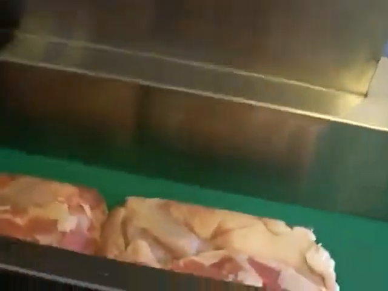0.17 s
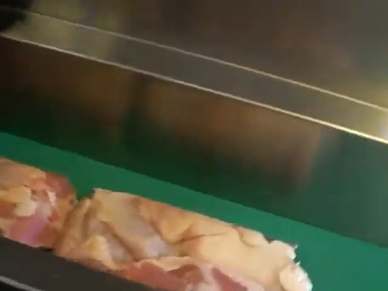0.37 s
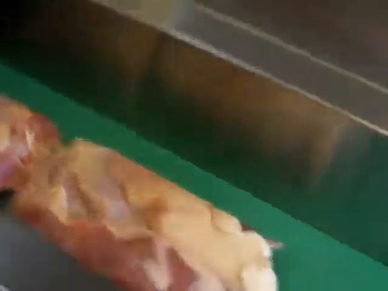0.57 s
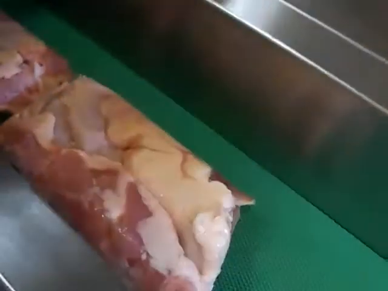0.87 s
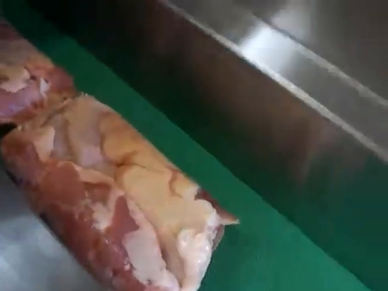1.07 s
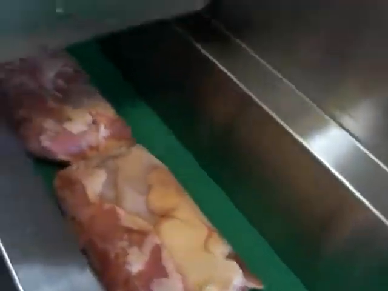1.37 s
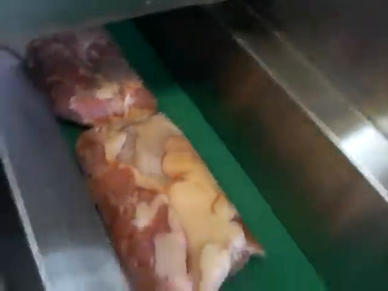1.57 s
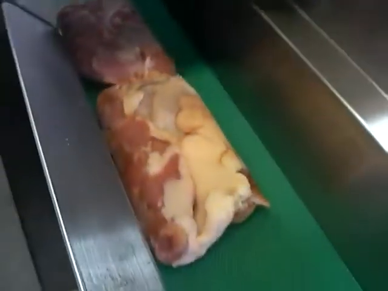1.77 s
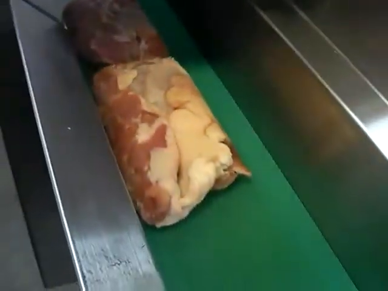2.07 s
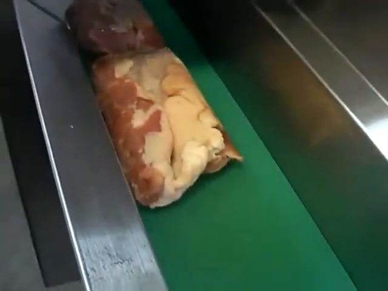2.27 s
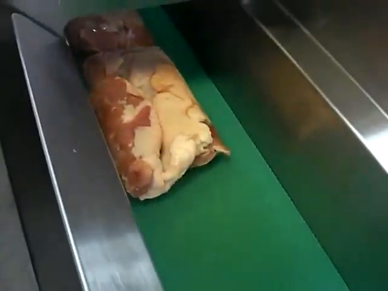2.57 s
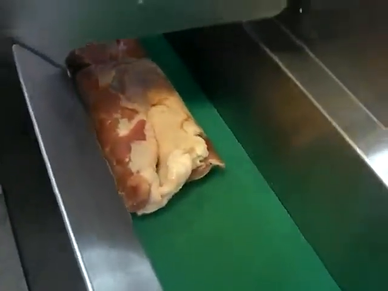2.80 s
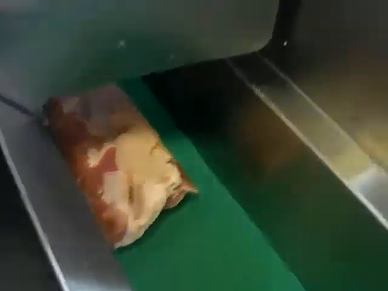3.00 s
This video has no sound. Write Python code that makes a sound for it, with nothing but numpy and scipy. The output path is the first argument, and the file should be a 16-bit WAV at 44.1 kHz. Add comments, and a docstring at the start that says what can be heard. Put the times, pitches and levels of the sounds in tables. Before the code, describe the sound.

Close hand-held phone beside a meat slicer: a ringing frame knock leads a harsh metallic bite and slam, repeating evenly eight times over steady broad rush and swelling high electric whine, with a little room echo.

```python
"""A meat slicer runs in a workshop, heard from a hand-held phone beside its belt.
Throughout, fans and belts rush (broad noise) and the inverter whines in thin lines that swell and fade.
Each turn the crank first knocks on the steel frame (damped beating modes, loose rattle);
then the blade bites and slams through: two bright clanks of dense random contacts, filtered by blade and guard.
From 0.84 s on, stray bright ticks and dull double taps fall in between."""
import sys
import numpy as np
from scipy import signal
from scipy.fft import rfft, irfft, next_fast_len
from scipy.io import wavfile

SR = 44100
rng = np.random.default_rng(int(sys.argv[2]) if len(sys.argv) > 2 else 0)


def master_out(mix):
    """Clip the mix to full scale and print it as 16-bit PCM to the path in sys.argv[1]."""
    frames = np.transpose(np.atleast_2d(mix))
    ceiling = np.clip(frames, -1, 1)
    pcm = np.round(ceiling * 32767).astype(np.int16)
    wavfile.write(sys.argv[1], SR, pcm)


def ratio(d):
    """dB to gain"""
    e = np.asarray(d, float) / 20
    return 10 ** e


N = 138474

# rush spectrum: f/Hz, relative density/dB
RUSH_SPECTRUM = [(25, -32), (132, 1.5), (230, -5.5), (300, 5), (481, -3.5), (780, -0.5), (1100, -6.5),
                 (3300, -13), (4130, -11.5), (6000, -11), (7660, -13), (9750, -10.5), (12500, -18.5),
                 (13800, -15), (15400, -5)]
# side-to-mid gain of everything but the whine: f/Hz, gain/dB
SIDE_GAIN = [(25, -19), (125, -20.5), (250, -24), (700, -15), (2000, -11.5), (4400, -4.5), (8000, -1.5),
             (15000, 0)]
# main inverter lines: f/Hz
WHINE_HZ = (10051, 9938, 3998)
# their mid levels as the phone moves: t/s, then one level/dB per line
WHINE_LEVELS = [(0, -50, -47, -48), (.17, -48, -40, -62), (.27, -49, -50, -45), (.38, -34.5, -43.5, -43),
                (.6, -50, -43, -48), (.88, -49, -46.5, -51.5), (1.2, -41, -39, -53),
                (1.38, -34, -44, -54.5), (1.56, -44, -48, -52), (1.68, -41, -48.5, -46),
                (1.798, -37, -43, -60), (2.0, -40, -54, -52.5), (2.11, -35.5, -47, -48),
                (2.2, -37.5, -51, -53.5), (2.45, -35.5, -43, -56), (2.8, -37.5, -44, -50.5),
                (2.9, -46.5, -46.5, -54.5), (3.14, -51, -36.5, -48)]
# faint inverter lines: f/Hz, mean level/dB
FAINT_LINES = [(1950, -65), (5940, -60), (6052, -58), (11881, -58)]
# dull double taps near the phone: t/s, level/dB, f/Hz
TAPS = [(.858, -10, 928), (0.86, -8, 418), (2.907, -9.5, 680), (2.942, -9, 800), (3.014, -7, 776),
        (3.084, 0.5, 620)]
# crank knocks: t/s, level/dB
KNOCKS = [(0.151, -14), (0.552, -12.5), (0.953, -14), (1.357, -15), (1.76, -13.5), (2.163, -14),
          (2.565, -13), (2.967, -12.5)]
# steel frame modes: f/Hz, level/dB, undamped t60/s, delay/ms
FRAME_MODES = [(322, -13.5, .3, 12.2), (377, -8.5, .15, 6), (1555, -17, .35, 1), (1603, -17.5, .25, 1),
               (476, -25, .15, 4), (786, -21, .3, 24), (1392, -19, .2, 1), (1925, -19.5, .2, 12),
               (2239, -20, .15, 4), (3560, -21, .09, 6)]
# loose rattle under a knock: f/Hz, relative density/dB
KNOCK_RATTLE_SPECTRUM = [(200, -62), (400, 7.5), (800, 2.5), (1600, 7.5), (2900, -1), (3630, 1), (6500, -3),
                         (8000, -22), (12000, -97)]
# blade bites: t/s, level/dB, level of the thud on the frame/dB
BITES = [(0.227, -21, -13), (0.627, -19.5, -17.5), (1.0314, -18.5, -11.5), (1.4326, -19.5, -18),
         (1.836, -20.5, -21), (2.2366, -22, -23.5), (2.6417, -19.5, -20), (3.047, -17, -16.5)]
# blade slams: t/s, level/dB
SLAMS = [(0.254, -18.5), (0.656, -18.5), (1.0574, -29), (1.4596, -20.5), (1.8617, -18.5), (2.2623, -15.5),
         (2.6662, -18.5), (3.0686, -24)]
# stray bright ticks: t/s, level/dB, t60/s
TICKS = [(0.842, -30, 0.053), (1.188, -34.5, 0.1), (3.126, -15.5, 0.013)]
# blade rattle spectrum: f/Hz, relative density/dB
BLADE_SPECTRUM = [(280, -23), (480, -3), (920, -2.5), (1200, -15.5), (2580, -9), (6170, -6.5), (8880, -7.5),
                  (13000, -11.5), (15300, -18.5)]
# blade and guard resonances: f/Hz, width/Hz, boost/dB
GUARD_PEAKS = [(1927, 230, 12), (6200, 230, 7), (8940, 270, 5.5)]

LOW_MODE_HZ = 600


def rms_one(x):
    """Scale to rms 1."""
    return x / np.sqrt(np.mean(x ** 2) + 1e-20)


def at_hz(points, hz):
    """Read a spectrum table on a log-frequency axis."""
    f, v = np.transpose(points)
    return np.interp(np.log(np.maximum(hz, 1)), np.log(f), v)


def colour(x, points, peaks=()):
    """Minimum-phase filter from a spectrum table plus resonances; unit power gain for white input."""
    size = next_fast_len(N + SR // 4) // 2 * 2
    hz = np.arange(size // 2 + 1) * SR / size
    db = at_hz(points, hz) + sum(p / (1 + (2 * (hz - f) / w) ** 2) for f, w, p in peaks)
    unit_power = ratio(db) / np.sqrt(np.mean(ratio(2 * db)))
    # folded cepstrum gives minimum phase
    cepstrum = irfft(np.log(unit_power), size)
    cepstrum[1:size // 2] *= 2
    cepstrum[size // 2 + 1:] = 0
    return irfft(rfft(x, size) * np.exp(rfft(cepstrum)), size)[..., :N]


def drift(rate_hz):
    """Random drift of rms 1: noise through two equal low-pass poles at rate_hz."""
    step = 40  # samples between drift points
    r = np.exp(-2 * np.pi * step * rate_hz / SR)
    noise = rng.standard_normal(N // step + 2002)
    slow = signal.lfilter([1], [1, -2 * r, r * r], noise)[2000:]  # skip the settling
    return np.interp(np.arange(N) / step, np.arange(len(slow)), rms_one(slow))


def bursts(times_s, db, rise_s, t60_s):
    """Summed envelopes: every event rises, then dies away exponentially."""
    t = np.arange(N) / SR - np.reshape(times_s, (-1, 1))
    t = np.maximum(t, 0)
    rise = 1 - np.exp(-(t / rise_s) ** 2)
    decay = ratio(-60 * t / np.reshape(t60_s, (-1, 1)))
    return ratio(np.asarray(db)) @ (rise * decay)


def tail(x, t60_s):
    """Diffuse reverberation: convolution with decaying noise of unit energy."""
    t = np.arange(int(t60_s * SR)) / SR
    ir = rng.standard_normal(SR * 2)[:len(t)] * ratio(-60 * t / t60_s)
    return signal.fftconvolve(x, ir / np.sqrt(np.sum(ir ** 2)))[:N]


def rattle():
    """Dense, uneven, clumped metal contacts as two unlike rows (mid, side), rms 1."""
    contacts_per_s, spread_db, clump_db, clump_hz = 9000, 2.0, 0.8, 38.0
    excess = np.minimum(rng.exponential(1, (2, N)), 4)
    sizes = ratio(spread_db * excess) * rng.choice([-1, 1], (2, N))
    hits = rng.random((2, N)) < contacts_per_s / SR
    return rms_one(sizes * hits * ratio(clump_db * drift(clump_hz)))


def clumps(x):
    """Each half-octave band flickers on its own, as different loose parts clatter in turn."""
    flicker_db, flicker_hz = 2.5, 140
    spectrum = rfft(x)
    octave = np.log2(np.maximum(np.arange(N // 2 + 1) * SR / N, 500) / 500)  # all below 500 Hz is one band
    out = 0
    for k in range(11):
        band = irfft(spectrum * np.maximum(1 - abs(2 * octave - k), 0), N)
        out = out + band * ratio(flicker_db * drift(flicker_hz))
    return out


def rush():
    """Fans, belt and far machines: broad noise that flickers a little."""
    level_db, flicker_db, flicker_hz = -38.5, 0.5, 54.0
    noise = colour(rng.standard_normal((2, N)), RUSH_SPECTRUM)
    return ratio(level_db + flicker_db * drift(flicker_hz)) * noise


def whine():
    """Inverter lines; mid and side fade apart because the phone moves through standing waves."""
    side_db, side_swing_db, faint_swing_db = (-39, -43, -56), 2.5, 2
    flicker_db, waver_rad = 1.2, 0.6
    t = np.arange(N) / SR
    s, *mid_db = np.transpose(WHINE_LEVELS)
    lines = []  # f/Hz, mid level/dB, side level/dB
    for k, hz in enumerate(WHINE_HZ):
        lines.append((hz, np.interp(t, s, mid_db[k]), side_db[k] + side_swing_db * drift(1.0)))
    for hz, db in FAINT_LINES:
        both_db = db + faint_swing_db * drift(1.3)
        lines.append((hz, both_db, both_db))
    out = np.zeros((2, N))
    for hz, *pair_db in lines:
        for k, level_db in enumerate(pair_db):
            phase = 2 * np.pi * hz * t + k * np.pi / 2 + waver_rad * drift(5.9)
            level = np.sqrt(2) * ratio(level_db + flicker_db * drift(6.0))  # dB are rms
            out[k] += level * np.sin(phase)
    return out


def taps():
    """Short dull knocks of one damped tone, each with a bounce."""
    rise_s, t60_s, bounce_s = 0.0014, 0.005, 0.00266
    t = np.arange(N) / SR
    out = np.zeros(N)
    for s, db, hz in TAPS:
        for start_s in (s, s + bounce_s):
            out += bursts([start_s], [db], rise_s, t60_s) * np.sin(2 * np.pi * hz * (t - start_s))
    return out


def struck(times_s, db):
    """Beating frame modes after blows; the load damps them soon. Side is a diffuse tail of mid."""
    rise_s, scatter_db, detune_ratio = 0.005, 1.2, 0.004
    free_s, damped_t60_s = 0.034, 0.045  # rings free, then damped
    t, out = np.arange(N) / SR, 0
    blow = np.clip(np.searchsorted(times_s - 0.02, t) - 1, 0, None)  # index of the current blow
    since_s = t - times_s[blow]
    shape = (len(times_s), len(FRAME_MODES))
    detune = 1 + detune_ratio * rng.standard_normal(shape)
    scatter = scatter_db * rng.standard_normal(shape)
    for k, (hz, mode_db, t60_s, delay_ms) in enumerate(FRAME_MODES):
        delay_s = delay_ms / 1000
        swell = bursts(times_s + delay_s - 1.37 * rise_s, db + mode_db + scatter[:, k], rise_s, t60_s)
        out = out + swell * np.cos(2 * np.pi * hz * detune[blow, k] * (since_s - delay_s))
    out = out * ratio(-60 * np.maximum(since_s - free_s, 0) / damped_t60_s)
    return np.array([out, tail(out, 0.086)])


def knocks():
    """The crank strikes the frame alike each turn, with a short loose rattle; the bite thuds on it softly."""
    rattle_db, rattle_rise_s, rattle_t60_s = -16, 0.0087, 0.35
    thud_late_s = 0.078  # after the knock
    (s, db), thud_db = np.transpose(KNOCKS), np.transpose(BITES)[2]
    envelope = bursts(s - rattle_rise_s, db + rattle_db, rattle_rise_s, rattle_t60_s)
    loose = clumps(colour(envelope * rattle(), KNOCK_RATTLE_SPECTRUM))
    low_pass = signal.butter(2, LOW_MODE_HZ, fs=SR, output="sos")
    thud = signal.sosfilt(low_pass, struck(s + thud_late_s, thud_db))
    return struck(s, db) + thud + loose


def shaken_frame(times_s, db):
    """Rattle drives the loaded frame: each mode is a short two-pole resonator."""
    rise_s, t60_s, ring_t60_s, low_mute_db = 0.0085, 0.26, 0.06, -3
    shake = rattle() * bursts(times_s, db, rise_s, t60_s) + 1e-18
    r = ratio(-60 / (ring_t60_s * SR))
    out = 0
    for hz, mode_db, *_ in FRAME_MODES:
        w = 2 * np.pi * hz / SR
        ring = signal.lfilter([0, np.sin(w)], [1, -2 * r * np.cos(w), r * r], shake)
        level_db = mode_db / 2 + low_mute_db * (hz < LOW_MODE_HZ)
        out = out + ratio(level_db) * ring * np.sqrt(1 - r) * 10
    return out


def blade():
    """Bite and slam rattle through blade and guard and shake the loaded frame; stray ticks share the path."""
    bite_lead_s, bite_rise_s, bite_t60_s, bite_db = 0.014, 0.014, 0.29, -3.5
    slam_lead_s, slam_rise_s, slam_t60_s, slam_db = 0.00069, 0.0017, 0.21, -10
    crack_db, crack_t60_s, crack_bounce_s = -14.5, 0.025, 0.0055  # a slam opens with a crack and its bounce
    shake_bite_db, shake_slam_db = -45.5, -47.5
    s1, db1, _ = np.transpose(BITES)
    s2, db2 = np.transpose(SLAMS)
    s3, db3, tick_t60_s = np.transpose(TICKS)
    bright = bursts(s1 - bite_lead_s, db1 + bite_db, bite_rise_s, bite_t60_s)
    bright += bursts(s2 - slam_lead_s, db2 + slam_db, slam_rise_s, slam_t60_s)
    bright += bursts(s3, db3, slam_rise_s, tick_t60_s)
    for lag_s in (0, crack_bounce_s):
        bright += bursts(s2 - slam_lead_s + lag_s, db2 + crack_db, slam_rise_s, crack_t60_s)
    clank = clumps(colour(bright * rattle(), BLADE_SPECTRUM, GUARD_PEAKS))
    shake_db = np.repeat([shake_bite_db, shake_slam_db], len(s1))
    return clank + shaken_frame(np.r_[s1, s2], shake_db)


def scene():
    """Machine in the room as mid and side, the side stronger in the treble; whine on top."""
    low_cut_hz, room_t60_s, room_db, wall_cut_hz = 260, 0.8, -11, 1700
    near = knocks() + blade() + taps() * [[1], [0]]  # taps in mid only
    near = signal.sosfilt(signal.butter(4, low_cut_hz, "high", fs=SR, output="sos"), near)
    walls = signal.butter(1, wall_cut_hz, fs=SR, output="sos")
    wet = signal.sosfilt(walls, [tail(v, room_t60_s) for v in near])
    mid, side = near + ratio(room_db) * wet + rush()
    hz = np.arange(N // 2 + 1) * SR / N
    side = irfft(rfft(side) * ratio(at_hz(SIDE_GAIN, hz)), N)
    mid, side = np.array([mid, side]) + whine()
    return np.array([mid + side, mid - side])


def roll_off(x):
    """The treble ends steeply here."""
    return signal.sosfilt(signal.butter(12, 15640, fs=SR, output="sos"), x)


def record(dry):
    """The phone has a narrow dip in the treble and a cut top."""
    notch_hz, notch_width_hz, notch_db, stop_hz = 7854, 367, -16, 15500
    hz = np.arange(N // 2 + 1) * SR / N
    dip_db = notch_db / (1 + (2 * (hz - notch_hz) / notch_width_hz) ** 2)
    x = irfft(rfft(dry) * ratio(dip_db), N)
    x = signal.sosfilt(signal.cheby2(12, 60, stop_hz, fs=SR, output="sos"), x)
    return roll_off(x)


dry = scene()
out = record(dry)
master_out(out)
```